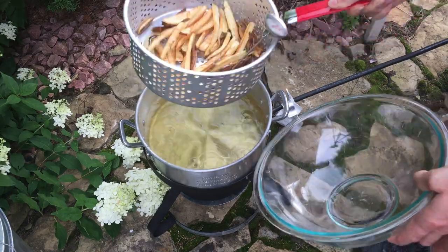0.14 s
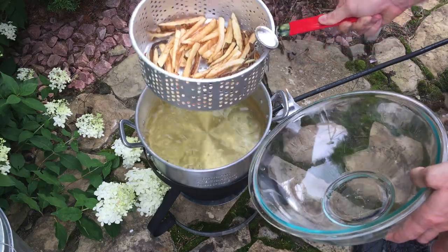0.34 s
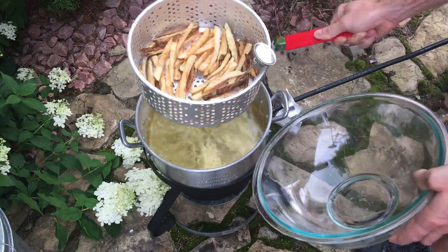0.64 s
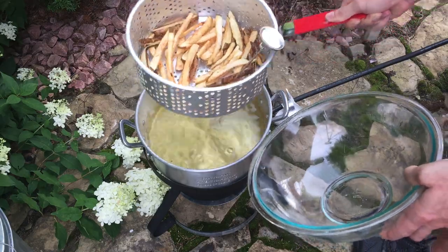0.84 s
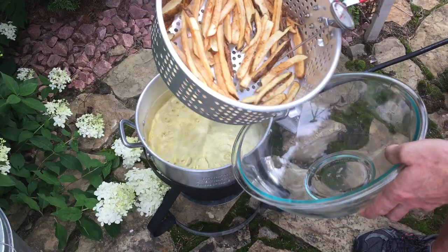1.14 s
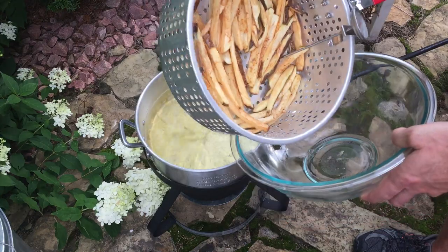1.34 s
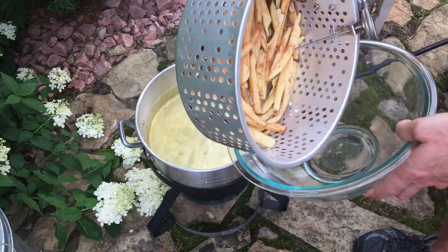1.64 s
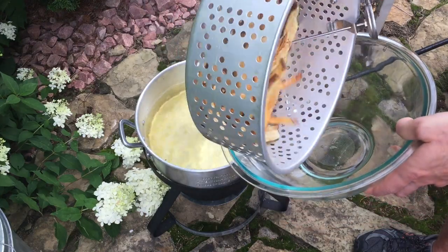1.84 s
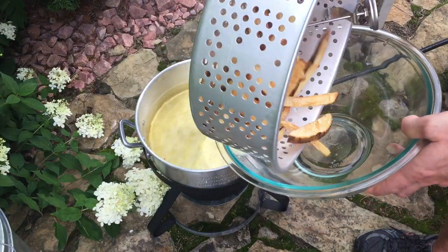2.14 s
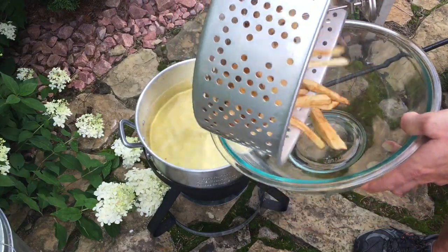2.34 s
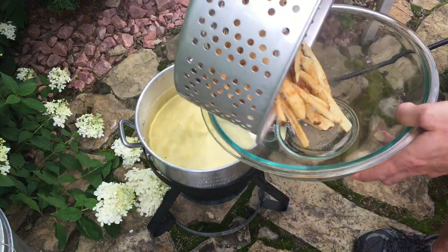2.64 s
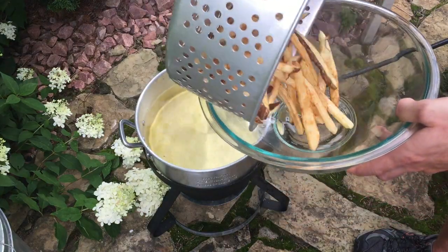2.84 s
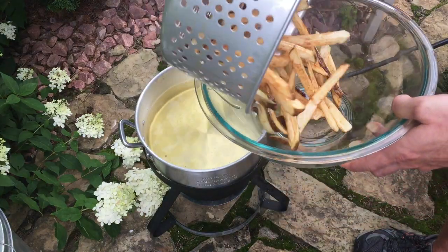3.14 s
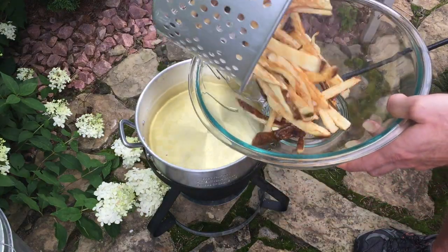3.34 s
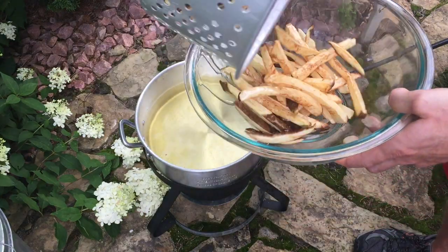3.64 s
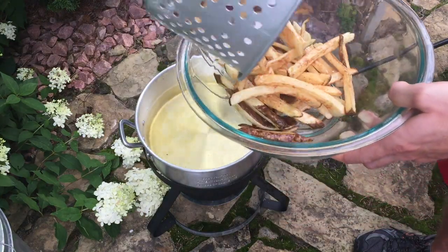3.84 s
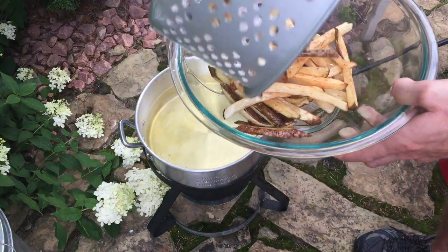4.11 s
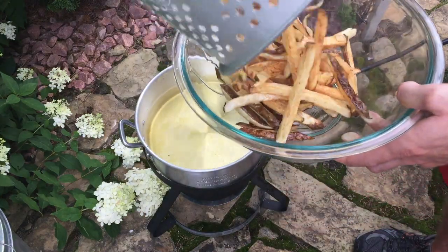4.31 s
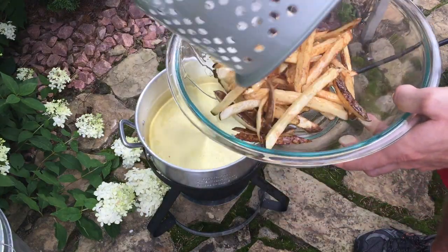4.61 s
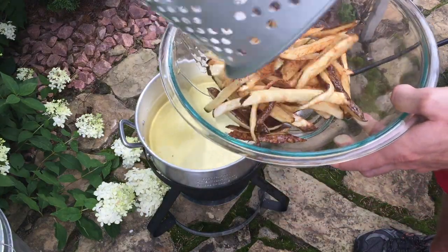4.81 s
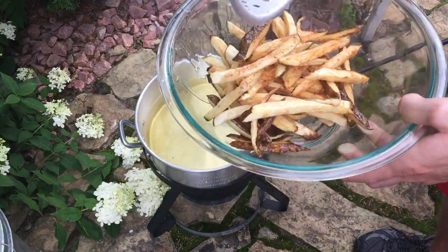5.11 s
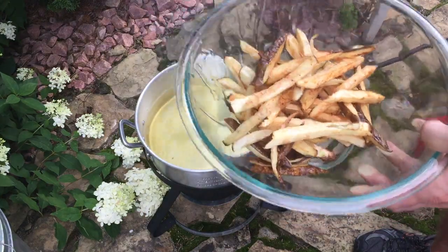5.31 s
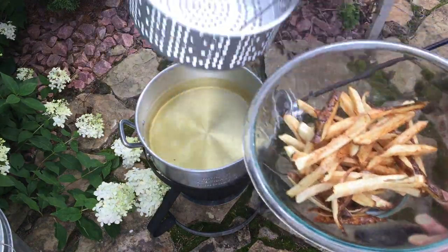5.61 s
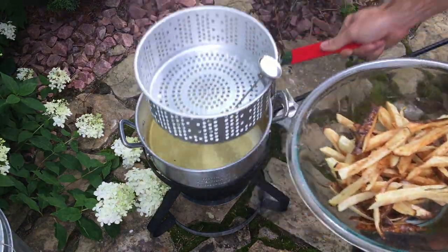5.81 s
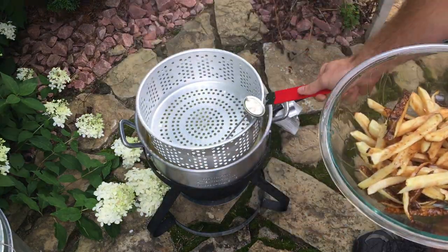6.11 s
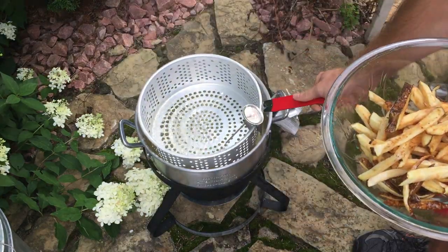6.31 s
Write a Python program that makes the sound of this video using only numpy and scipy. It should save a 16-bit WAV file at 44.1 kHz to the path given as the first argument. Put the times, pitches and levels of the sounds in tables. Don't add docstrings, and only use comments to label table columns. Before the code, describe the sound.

Close in a garden, a burner rumbles softly as a hanging metal basket rattles lightly. It knocks hard against a glass bowl, clinks on the rim, and shakes out crusty fries that scrape, snap and thump down. Faint bird whistles and one distant dog bark follow, then the empty basket clanks onto its pot. One near microphone, heard only on the left.

```python
import sys
import numpy as np
from scipy import signal
from scipy.fft import rfft, irfft
from scipy.io import wavfile
from scipy.ndimage import uniform_filter1d

SR = 44100
rng = np.random.default_rng(int(sys.argv[2]) if len(sys.argv) > 2 else 0)


def volts_from_db(level):
    exponent = np.asarray(level, float) / 20
    return 10 ** exponent


def store_pcm(level_fs):
    pcm = np.round(np.clip(level_fs, -1, 1) * 32767).astype(np.int16)
    wavfile.write(sys.argv[1], SR, np.atleast_2d(pcm).T)


N = 285131

# pitch_hz, density_db [dB per Hz]
GARDEN = [(12, -75.5), (20, -31.5), (59, -11), (113, -1.5), (202, -17), (274, -10), (316, -13.5),
          (616, -14.5), (748, -14.5), (814, -17.5), (1420, -13), (2850, -25.5), (3460, -25), (4840, -29),
          (15600, -34)]
# pitch_hz, width_hz, level_db
BURNER = [(72, 44, -66.5), (605, 77, -69), (940, 190, -77.5), (1391, 38, -77), (1856, 67, -77),
          (6770, 1300, -78.5), (9200, 500, -81.5)]
# peak_s, level_db, rise_s, fall_s
GUSTS = [(.3, -52.5, 0.45, 0.65), (1.15, -45, 0.071, 0.044), (1.39, -32, 0.012, 0.034),
         (1.46, -49.5, .04, 0.62), (2.12, -43.5, 0.044, 0.89), (2.47, -42, 0.43, 0.06),
         (2.735, -43, 0.055, 0.31), (3.65, -49.5, 1, 0.067), (4.08, -42, 0.26, 0.09),
         (4.66, -57, 0.49, 0.057), (5.33, -53, 0.37, 0.037), (5.68, -59, .5, 0.38), (5.9, -48, 0.087, 1.6),
         (6.42, -52, 0.46, .4)]
# time_s, level_db
INSECTS = [
    (0, -99),
    (4.7, -80),
    (5.4, -70),
    (6.47, -66.5),
]
GARDEN_DB, FLAME_DB = -59.5, -63

# start_s, level_db, pitch_hz, thud_db, fizz_db
RATTLES = [(0.028, -38.5, 2670, -2.5, -24), (0.078, -33, 1720, -5.5, -21), (0.133, -37, 3570, -2, -12),
           (0.1683, -21.5, 4430, -12.5, -14), (0.285, -39, 4160, -3, -18), (0.3197, -39.5, 4940, -7, -12),
           (0.3577, -29.5, 3450, -1, -21), (0.385, -28.5, 1740, 1, -14), (0.435, -48, 3500, -10, -25),
           (0.4893, -40.5, 3430, -17, -17), (0.6394, -46, 1430, -12, -21), (4.596, -51, 3200, 15, -5),
           (6.231, -36, 5660, -25, -19), (6.2694, -46.5, 3020, -20, -18), (6.289, -50, 4570, -16, -22)]
# start_s, level_db, pitch_hz, thud_db, fizz_db
TUMBLES = [(1.776, -19.5, 2120, -10.5, -19), (2.285, -26, 2280, 0.5, -9), (2.5905, -32, 3120, -16, -21),
           (2.724, -33, 2980, 2, -23), (2.7616, -23.5, 3200, -21, -7), (3.269, -33, 1730, 7, -4),
           (3.3697, -28, 5800, -4, -12.5), (3.3888, -39, 3100, 3, 2.5), (3.419, -27, 1890, -2, -8),
           (3.6907, -27, 4460, -25, -19), (3.8277, -30, 2340, 4.5, -7), (3.903, -27.5, 3380, -23, -3),
           (3.9812, -25, 2670, -16, -24), (4.0596, -28, 3470, 3.5, -7), (4.15, -31.5, 2760, -3, -3),
           (4.2344, -31, 3160, 4.5, -9.5), (4.383, -35, 2000, -22, -12), (4.497, -47, 4400, -11, -4),
           (4.5238, -34, 2050, 7, -18), (4.645, -31, 2200, -12, -18), (4.7324, -53, 1900, -15, -11),
           (4.7514, -35.5, 2030, -11, -17), (1.5472, -36, 1680, -10, -12), (1.7133, -31, 1730, -12, -12),
           (2.6432, -34, 3120, -15, -13), (3.1835, -35, 3450, -7, -6), (3.3403, -33, 2050, 3, -10),
           (3.5865, -34, 4070, -15, -11), (4.0934, -32, 2390, -4, -10), (4.279, -34, 7050, -15, 0.5)]
KNOCK_T60_S, KNOCK_DB, SOFTER_LONGER = 0.094, -30, 0.26
KNOCK_RISE_S, FIZZ_RISE_S, KNOCK_TICK_DB = 0.0012, 0.0041, -7

# pitch_hz, level_db
BASKET = [(1130, -6), (2245, -6.5), (2700, -3.5), (3060, -1.5), (3380, -3), (3600, -8.5), (4090, -0.5),
          (4400, -2), (4920, -1.5), (5200, -3), (5560, 1), (5950, -4), (6500, -9), (7250, -7.5)]
# start_s, level_db, brightest_hz, t60_s
JINGLES = [(.078, -52, 2500, .05), (.134, -53, 4500, 0.037), (0.1688, -38.5, 4170, 0.078),
           (0.437, -58, 3600, .04), (1.1395, -38, 3500, 0.05), (1.3816, -34, 4000, 0.08),
           (1.6002, -37.5, 4500, .07), (1.9357, -44, 5160, 0.05), (1.994, -27.5, 4600, .045),
           (2.107, -42, 5000, 0.086), (2.1849, -33, 4200, 0.065), (2.2286, -33, 4470, .08),
           (2.288, -42, 3000, 0.046), (2.332, -33.5, 4500, 0.047), (2.374, -37, 3000, .07),
           (2.475, -37, 3000, 0.079), (2.591, -43, 3000, .06), (2.761, -36.5, 3000, 0.058),
           (2.838, -47, 2900, 0.057), (2.992, -54.5, 4950, 0.09), (3.6024, -44.5, 3300, 0.077),
           (3.6907, -46, 4400, .07), (3.9804, -44, 2750, .1), (4.093, -45, 2700, 0.054),
           (4.2793, -46, 3300, .07), (4.525, -49, 4500, 0.096), (5.8829, -34, 5400, 0.037),
           (5.91, -50, 4500, .07), (6.062, -55, 4600, 0.12)]
CHATTER_T60_S, JINGLE_SLOPE_DB, JINGLE_SPREAD_DB = 0.0098, -12, 3.5

# start_s, level_db
SPITS = [(.255, -60.5), (.665, -61), (.779, -62), (0.991, -52), (5.857, -51), (5.941, -51), (6.184, -57)]

# pitch_hz, density_db [dB per Hz]
SCRAPE = [(150, -39), (250, -19.5), (593, -3.5), (729, -12), (1140, 0.5), (1290, -1), (2800, -2.5),
          (7640, -6.5), (9560, 0.5), (15500, -3.5)]
# peak_s, scrape_db, rise_s, fall_s, brightness_db
SHAKES = [(0.382, -38.5, 0.046, 0.025, 2), (1.24, -63, .03, 0.11, -12), (1.404, -38, 0.066, 0.02, -7),
          (1.69, -43.5, 0.57, 1, -1.5), (1.95, -39, 0.24, 0.37, 2), (2.39, -36.5, 0.16, 0.3, -0.5),
          (2.5, -38.5, 0.077, 0.22, 0.5), (2.664, -37, 0.054, 0.22, 1.5), (2.738, -41, 0.047, 0.2, -7.5),
          (2.805, -36.5, 0.064, 0.048, 0.5), (2.936, -43.5, 0.11, 0.082, 4), (3.0, -45.5, .06, 0.091, -6),
          (3.075, -40, 0.12, 0.11, 0.5), (3.12, -39, 0.06, 0.11, 2), (3.19, -41.5, 0.07, 0.12, 6.5),
          (3.265, -40, 0.15, .08, -1), (3.31, -46, .04, 0.047, 6), (3.38, -39.5, 0.12, 0.15, -3),
          (3.465, -46, .04, 0.14, -3), (3.55, -48, 0.11, 0.089, -1.5), (3.613, -41.5, 0.11, 0.14, 1),
          (3.734, -41, 0.038, 0.21, 4), (3.835, -40, 0.037, 0.073, 3), (3.902, -37, 0.097, 0.071, 3),
          (3.948, -42, 0.022, 0.042, -1), (4.001, -37.5, 0.023, 0.19, 3), (4.065, -37, 0.04, 0.055, 1),
          (4.1, -40.5, .02, .06, -1), (4.162, -40.5, 0.066, 0.074, 4.5), (4.24, -43, .02, 0.067, -2),
          (4.284, -41.5, 0.085, 0.13, 3.5), (4.535, -47, 0.091, .12, -2), (4.656, -60, 0.073, 0.17, 2)]
# peak_s, scrape_db, rise_s, fall_s, brightness_db
SETTLING = [
    (6.08, -48.5, 0.032, 0.043, 16.4),
    (6.237, -61, 0.035, 0.065, 14.6),
]
THUD_DB, FIZZ_DB = -10.5, -9.5
PATCHY_DB, SINGING_DB, SINGING_WIDTH_HZ = 2.8, -14, 39

# start_s, level_db, pitch_hz
SNAPS = [(0.3879, -28.5, 2000), (.608, -45, 3300), (2.078, -34, 1800), (2.689, -33, 4980),
         (2.7247, -29.5, 3000), (2.7614, -26, 2500), (3.0187, -38, 7000), (3.194, -31.5, 4000),
         (3.311, -35, 7000), (3.3698, -29.5, 5700), (3.3873, -31.5, 3500), (3.42, -34, 3000),
         (3.4628, -36.5, 2000), (3.8303, -30.5, 1500), (3.944, -35, 4500), (4.0645, -30, 3400),
         (4.152, -29, 3500), (4.3848, -48, 2000), (4.499, -31.5, 5000), (4.5233, -43, 2300),
         (4.5977, -47, 1800), (4.6447, -50, 2200), (4.734, -47.5, 4200), (1.1396, -18, 1300),
         (1.1415, -18, 800), (1.1618, -17, 1400), (2.1845, -19, 1530), (2.332, -23, 1800),
         (5.883, -21, 1000), (5.897, -29, 1100), (5.912, -27, 1000), (.991, -53, 3500), (.566, -55, 1700),
         (1.1475, -22, 650)]
SNAP_T60_S = 0.011

# start_s, length_s, first_hz, last_hz, level_db
BIRD = [
    (0.565, 0.36, 3442, 3150, -69),
    (4.434, .2, 3390, 3220, -58.5),
    (4.915, 0.3, 3610, 3080, -70),
]
BEND_FROM, BEND_SPAN, SCOOP, SCOOP_S, NOTE_SWELL = 0.6, 0.25, 0.1, 0.004, 0.25

# start_s, main_mode_db [1030 Hz], main_mode_t60_s, next_mode_db [1916 Hz], hardness_db
FREE_CLINKS = [
    (1.1393, -19, 0.18, -6, -3),
    (1.1605, -22, 0.44, -7.5, -23),
    (1.2005, -41.5, 0.32, 3, 10),
    (1.2248, -44.5, 0.15, 7.5, 5),
]
# start_s, main_mode_db [1030 Hz], main_mode_t60_s, next_mode_db [1916 Hz],
# hardness_db
LEANING_CLINKS = [(1.383, -27.5, 0.23, -10.5, 3.5), (1.457, -25.5, 0.18, -4, -6),
                  (1.495, -40.5, 0.47, -7, 0), (1.599, -18, 0.14, -11, -11),
                  (1.726, -27.5, 0.047, -22, -19), (1.8488, -31, 0.039, -12, -10),
                  (1.993, -27.5, 0.064, -18, -16), (2.185, -21, 0.12, -16, -11),
                  (2.2269, -29.5, 0.18, -9, -6), (2.3327, -23.5, 0.1, -9.5, -5),
                  (2.372, -32.5, 0.19, -9, -2), (2.4725, -39.5, 0.17, -1.5, -1)]
# [of the main mode's time, given with each clink; main mode 1030 Hz]
BOWL = [(387.3, -15, 0.97), (644, -11, 0.31), (1030.4, -3, 1.09), (1916, 4, 0.66), (2980, 1, 0.44),
        (4220, -7, 0.48), (4660, -14, 0.3), (5600, -7, 0.5), (5730, -19, 0.44), (6700, -53, .4),
        (7100, -45, 0.53)]
# time_s, pitch_hz
LEANING = [(1.38, 1079), (1.6, 1086), (2.0, 1094), (2.2, 1089), (2.47, 1079)]
LEAN_DB = -22
UPPER_DB = -8.5
SPLIT, SPLIT_DB = 0.0124, -11.5
FREE_CHOKE_DB, LEAN_CHOKE_DB = -1.5, -9

# start_s, crack_db, thud_db, body_db, t60_s
BLOWS = [(1.1397, -19, -4.5, 2, 0.14), (1.149, -50, -17, 22, 0.12), (1.16, -48, 9, -2, 0.096),
         (1.2008, -34.5, -4, -2, 0.24), (1.3817, -22, -2.5, 3, 0.17), (1.391, -36, 13, 15, 0.027),
         (1.4551, -34, 4.5, 7, 0.16), (1.4952, -36.5, -4, 3, 0.28), (1.5989, -30, -1.5, 9, 0.2),
         (1.671, -44.5, -19, 0, 0.28), (1.724, -39, -3, -2.5, 0.64), (1.8494, -35.5, -1.5, -2, 0.15),
         (1.894, -40, -16, 0, 0.14), (1.9927, -16.5, -21, -10, 0.074), (2.1059, -24, -10.5, -4.5, 0.11),
         (2.184, -24, -3, 1, 0.095), (2.2286, -25.5, -3, -4.5, 0.14), (2.3307, -22.5, -1.5, -1, 0.093),
         (2.374, -30, 2, 0.5, 0.13), (2.439, -34, -22, -14, 0.064), (2.464, -46, 14, -15, 0.1),
         (2.4723, -42.5, 8.5, -6, 0.047), (5.881, -26, -5.5, -1.5, 0.23)]
# low_hz, high_hz
BANDS = [
    (2100, 7000),
    (410, 800),
    (1100, 2100),
    (7000, 15600),
]
BLOW_FIZZ_DB, HARD_CONTACT = -3.5, 5.0

# start_s, level_db, pitch_hz
THUMPS = [(1.78, -45, 330), (2.478, -39.5, 230), (2.722, -34, 280), (3.445, -52, 230), (3.83, -42, 600),
          (4.06, -40.5, 237), (4.132, -40, 695)]
THUMP_T60_S, THUMP_RISE_S = 0.084, 0.0043

# time_s, pitch_hz, effort_db
BARK = [
    (5.272, 290, -30),
    (5.285, 321, -8),
    (5.297, 384.4, -14),
    (5.315, 439.7, -2.5),
    (5.345, 490, 0.5),
    (5.364, 460, -5),
    (5.38, 406, -22),
]
# pitch_hz, width_hz, level_db
THROAT = [(460, 300, -14), (935, 225, 8), (1330, 340, -8.5), (1750, 350, -24)]
BARK_DB, BARK_JITTER, BARK_HOARSE = -43.5, 0.015, 1.2

# pitch_hz, level_db, t60_s
POT = [(309, 0, 0.43), (392.7, -8.5, 0.36), (600, -10.5, 0.28), (920, -4, 0.22), (1044, 10, 0.084),
       (1183, -2.5, 0.3), (975, -7, 0.23), (1102, 0, .18), (1680, -2.5, 0.28), (1784, -2, 0.24),
       (1930, -6.5, 0.31), (1421, -10, 0.25), (2530, -9, 0.078), (2777, -11, 0.28)]
POT_S, POT_DB = 5.882, -30

# pitch_hz, level_db
AIR = [(9000, -1.5), (10500, -6)]
EDGE_HZ = 15400


def evened(x):
    return x / np.sqrt(np.mean(x ** 2) + 1e-20)


def add(mix, s, sound):
    part = mix[round(s * SR):][:len(sound)]
    part += sound[:len(part)]


def colour(x, points):
    f, db = np.transpose(points)
    hz = np.fft.rfftfreq(len(x), 1 / SR)
    gain = volts_from_db(np.interp(np.log(hz + 1), np.log(f + 1), db))
    return irfft(rfft(x) * gain, len(x))


def band(x, edges):
    return signal.sosfilt(signal.butter(3, edges, "bandpass", fs=SR, output="sos"), x)


def resonate(x, hz, width):
    return signal.lfilter(*signal.iirpeak(hz, hz / width, SR), x)


def resonate_twice(x, hz, width):
    return resonate(resonate(x, hz, width), hz, width)


def fuzz(hz, width):
    return evened(resonate_twice(rng.standard_normal(N), hz, width))


def full(slow):
    return np.interp(np.arange(N) / 64, np.arange(len(slow)), slow)


def wander(rate):
    steps = rng.standard_normal(N // 64 + 2)
    return evened(full(signal.lfilter(*signal.butter(2, rate, fs=SR / 64), steps)))


def swells(rows):
    s, db, rise, drop = np.transpose(rows)[:4, :, None]
    t = np.arange(0, N + 64, 64) / SR - s
    return volts_from_db(db - 20 * np.where(t < 0, -t / rise, t / drop))


def ring(hz, db, t60, length):
    t = np.arange(length)[:, None] / SR
    return (volts_from_db(db - 60 * t / t60) * np.sin(2 * np.pi * hz * t)).sum(1)


def fall(db, t60, tick_db):
    t = np.arange(8000) / SR
    return volts_from_db(db - 60 * t / np.clip(t60, .01, .3)) + volts_from_db(db + tick_db - 60 * t / 0.0042)


def yard(x, t60, wet_db):
    t = np.arange(20000) / SR
    sparse = rng.standard_normal(len(t)) * (rng.random(len(t)) < .03)
    taps = sparse * volts_from_db(-60 * t / t60) * (t > .012)
    return x + volts_from_db(wet_db) * signal.oaconvolve(x, taps / np.linalg.norm(taps))[:N]


def garden():
    wash = volts_from_db(GARDEN_DB - 2.5 + .9 * wander(3)) * evened(colour(rng.standard_normal(N), GARDEN))
    flame = full(swells(GUSTS).max(axis=0)) + volts_from_db(FLAME_DB)
    rumble = fuzz(126.4, 25) + fuzz(155, 37) + 0.42 * fuzz(212, 83)
    wash += flame * volts_from_db(-11.5 + 3.06 * wander(9.3)) * rumble
    for hz, width, db in BURNER:
        wash += volts_from_db(db + 2.0 * wander(5.6)) * fuzz(hz, width)
    insect_db = np.interp(np.arange(N) / SR, *np.transpose(INSECTS), -110, -110)
    hiss = evened(resonate(rng.standard_normal(N), 15500, 1500))
    return wash + volts_from_db(insect_db + 1.5 * wander(30)) * hiss


def ticks():
    out, grit = np.zeros(N), rng.standard_normal((60, 8000))
    t = np.arange(8000) / SR
    for (s, db, hz, thud_db, fizz_db), noise in zip(RATTLES + TUMBLES, grit):
        t60 = KNOCK_T60_S * volts_from_db(SOFTER_LONGER * (KNOCK_DB - db))
        burst = noise * fall(db - 8, t60, KNOCK_TICK_DB) * np.minimum(t / KNOCK_RISE_S, 1)
        click = volts_from_db(db + 6) * resonate_twice(t == 0, hz, 3000)
        metal = resonate(burst, hz, 285)
        metal = metal + 0.29 * resonate(burst, 0.76 * hz, 300) + 0.5 * resonate(burst, 1.226 * hz, 220)
        ping = 2.52 * resonate(metal, hz, 2300) + 0.33 * band(burst, (1300, 7000))
        thud = volts_from_db(thud_db + 6) * band(burst, (480, 950))
        fizz = volts_from_db(fizz_db + 8) * np.minimum(t / FIZZ_RISE_S, 1) * band(burst, (5000, 15000))
        add(out, s, click + ping + thud + fizz)
    return out


def basket():
    out, (hz, db) = np.zeros(N), np.tile(np.transpose(BASKET), 2)
    chatter = rng.standard_normal((40, 600)) * volts_from_db(-60 * np.arange(600) / SR / CHATTER_T60_S)
    chance = rng.standard_normal((40, 3, len(hz)))
    for (s, knock_db, top_hz, t60), (spot, tune, last), rap in zip(JINGLES, chance, chatter):
        octaves_off = abs(np.log2(hz / top_hz))
        mode_db = knock_db - 3.5 + db + JINGLE_SLOPE_DB * octaves_off + JINGLE_SPREAD_DB * spot
        modes = ring(hz * (1 + .02 * tune), mode_db, np.clip(t60, .02, .2) * volts_from_db(1.8 * last), 4000)
        add(out, s, signal.fftconvolve(modes, rap / np.linalg.norm(rap)))
    return out


def oil():
    out = np.zeros(N)
    for (s, db), noise in zip(SPITS, rng.standard_normal((20, 8000))):
        add(out, s, noise * fall(db, 0.01, 1))
    return band(out, (6500, 15000))


def fries():
    z = rng.standard_normal((N // 64 + 5, 129, 3))
    patches = evened(uniform_filter1d(uniform_filter1d(z[..., 2], 22, 0), 2, 1))
    spectra = (z[..., 0] + 1j * z[..., 1]) * volts_from_db(PATCHY_DB * patches)
    rub = signal.istft(spectra.T, nperseg=256, noverlap=192)[1][:N]
    sizes = volts_from_db(4.3 * np.minimum(rng.exponential(1, N), 3.2))
    grains = sizes * (rng.random(N) < 2500 / SR) * rng.standard_normal(N)
    unsteady = volts_from_db(1.63 * wander(28.5) + 1.2 * wander(73))
    rub = colour((evened(rub) + 0.66 * evened(grains)) * unsteady, SCRAPE)
    t, singing = np.arange(N) / SR, np.zeros(N)
    for k, (hz, db) in enumerate(BASKET):
        drift_db = 1.7 * np.sin(k * 1.696 + t * (9 + k))
        singing += volts_from_db(db + drift_db) * resonate(rub, hz, SINGING_WIDTH_HZ)
    rub = evened(rub) + volts_from_db(SINGING_DB) * evened(singing)
    strokes, bright_db = swells(SHAKES + SETTLING), np.transpose(SHAKES + SETTLING)[4]
    tilts = (0 * bright_db, THUD_DB - bright_db, FIZZ_DB + bright_db)
    scrape, thud, fizz = (full(np.sqrt(volts_from_db(2 * db) @ strokes ** 2)) for db in tilts)
    parts = [(0.49 * scrape, (900, 3500)), (thud, (300, 900)), (fizz, BANDS[3]),
             (0.82 * np.sqrt(scrape * fizz), (3500, 7000))]
    return volts_from_db(-1.5) * sum(uniform_filter1d(g, 200) * evened(band(rub, e)) for g, e in parts)


def snaps():
    out, t = np.zeros(N), np.arange(800) / SR
    for (s, db, hz), noise in zip(SNAPS, rng.standard_normal((40, 800))):
        burst = resonate(((t == 0) * 1.9 + noise) * volts_from_db(-60 * t / SNAP_T60_S), hz, 1.03 * hz)
        add(out, s, volts_from_db(db + 2) * burst / abs(burst).max())
    return out


def bird():
    out, quaver = np.zeros(N), wander(38)
    for s, length, held_hz, last_hz, db in BIRD:
        u = np.linspace(0, 1, round(length * SR))
        shake = quaver[round(s * SR):][:len(u)]
        bend = np.sin(np.pi / 2 * np.clip((u - BEND_FROM) / BEND_SPAN, 0, 1)) ** 2
        scoop = SCOOP * np.exp(-u * length / SCOOP_S)
        hz = (held_hz + (last_hz - held_hz) * bend) * (1 - scoop + 0.0044 * shake)
        swell_db = 4.5 * np.exp(-((u - BEND_FROM) / .08) ** 2)
        level = volts_from_db(db - 1 + 1.8 * shake - 5 * bend + swell_db) * np.sin(np.pi * u) ** NOTE_SWELL
        add(out, s, level * np.sin(2 * np.pi * np.cumsum(hz) / SR))
    return yard(out, .25, -5)


def bowl():
    out, (hz, db, share) = np.zeros(N), np.transpose(BOWL)
    chance, t = rng.standard_normal((40, len(BOWL))), np.arange(9000) / SR
    clinks = FREE_CLINKS + LEANING_CLINKS
    nexts = [row[0] for row in clinks[1:]] + [N / SR]
    for i, ((s, ring_db, t60, next_mode_db, hard_db), spot, then) in enumerate(zip(clinks, chance, nexts)):
        leaning = i >= len(FREE_CLINKS)
        tuned = hz
        if leaning:
            lean_hz = np.interp(s, *np.transpose(LEANING))
            tuned = np.sqrt(hz ** 2 + (lean_hz ** 2 - hz[2] ** 2) * np.where(hz < hz[2], .35, .9))
        upper_db = hard_db + UPPER_DB + 4.5 * spot[5:]
        mode_db = ring_db + db + np.r_[2 * spot[0] + LEAN_DB * leaning, 3 * spot[1], 0,
                                       next_mode_db, hard_db, upper_db]
        choke_db = LEAN_CHOKE_DB if leaning else FREE_CHOKE_DB
        choke = volts_from_db(choke_db * np.clip((t + s - then) / 0.0046, 0, 1))
        lasts = np.clip(t60, .03, .6) * share
        main = ring(tuned * (1 + 0.0014 * spot), mode_db + 0.5, lasts, 9000)
        twin = ring(tuned * (1 + SPLIT * spot[::-1]), mode_db + SPLIT_DB, 1.26 * lasts, 9000)
        add(out, s, choke * (main + twin))
    return out


def blows():
    shape = np.zeros((4, N))
    for s, db, thud_db, body_db, t60 in BLOWS:
        parts_db = (0, thud_db + 8.5, body_db + 5.5, BLOW_FIZZ_DB)
        for row, part_db, lasts in zip(shape, parts_db, (0.9, 0.51, 0.55, 0.89)):
            add(row, s, fall(db + part_db - 9.5, t60 * lasts, -14.5))
    first = np.isin(np.arange(N), [round(row[0] * SR) + 9 for row in BLOWS])
    rattle = rng.standard_normal(N) * volts_from_db(1.96 * wander(117)) + HARD_CONTACT * first
    rattle = colour(rattle, [(250, 19), (2500, -3), (15000, -10)])
    return sum(band(row * rattle, e) / np.std(band(rattle, e)) for row, e in zip(shape, BANDS))


def thumps():
    out, t = np.zeros(N), np.arange(5000) / SR
    for (s, db, hz), noise in zip(THUMPS, rng.standard_normal((20, 5000))):
        puff = evened(resonate_twice(noise, hz, 0.58 * hz))
        add(out, s, volts_from_db(db - 60 * t / THUMP_T60_S) * np.minimum(t / THUMP_RISE_S, 1) * puff)
    return out


def dog():
    s, hz, db = np.transpose(BARK)
    t = np.arange(N) / SR
    turns = np.cumsum(np.interp(t, s, hz) * (1 + BARK_JITTER * wander(115))) / SR
    folds = BARK_HOARSE * rng.standard_normal(N)
    for k in range(1, 6):
        rough = volts_from_db(.9 * (k > 2) * k * wander(45))
        folds += rough * np.cos(2 * np.pi * k * turns)
    throat = sum((-1) ** k * volts_from_db(d) * resonate_twice(folds, f, w) for k, (f, w, d) in enumerate(THROAT))
    effort = uniform_filter1d(volts_from_db(BARK_DB + np.interp(t, s, db, -90, -90)), 150)
    return yard(effort * throat, 0.62, -11)


def pot():
    out, (hz, db, t60) = np.zeros(N), np.transpose(POT)
    crowd = np.sort(rng.uniform(880, 9000, 220))
    crowd_db = POT_DB - 7.5 - 7.3 * np.log2(crowd / 1000) + 2 * rng.standard_normal(220)
    twin = 1 + 0.027 * rng.uniform(-0.81, 1, len(hz))
    chatter = rng.standard_normal(1500) * volts_from_db(-60 * np.arange(1500) / SR / 0.028)
    clatter = ring(crowd, crowd_db, 0.34 * (crowd / 1000) ** -.7, 16000)
    add(out, POT_S, signal.fftconvolve(clatter, chatter / np.linalg.norm(chatter)))
    strong = ring(hz, db + POT_DB, t60, 24000)
    strong -= ring(hz * twin, db + POT_DB - 4.5, 0.92 * t60, 24000)
    add(out, POT_S, strong * np.minimum(np.arange(24000) / 90, 1))
    return out


def scene():
    near = band(bowl() + pot(), (110, 16000)) + blows() + ticks() + fries()
    near = near + basket() + snaps() + thumps()
    far = garden() + bird() + dog() + oil()
    mono = yard(colour(near, AIR), 0.078, -16.5) + far
    return np.array([2 * mono, 0 * mono])


def band_limit(x):
    return signal.sosfilt(signal.butter(12, 16640, fs=SR, output="sos"), x)


def record(dry):
    edge = signal.firwin(401, EDGE_HZ, window=("kaiser", 5), fs=SR)
    mix = signal.oaconvolve(dry, edge[None], "same")
    return band_limit(mix)


dry = scene()
out = record(dry)
store_pcm(out)
```